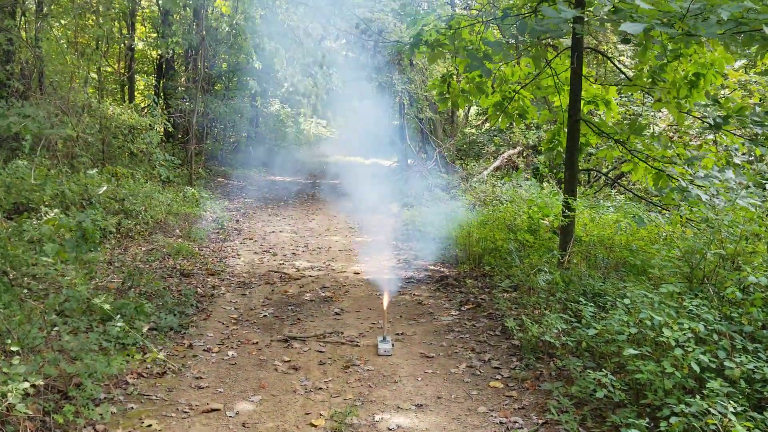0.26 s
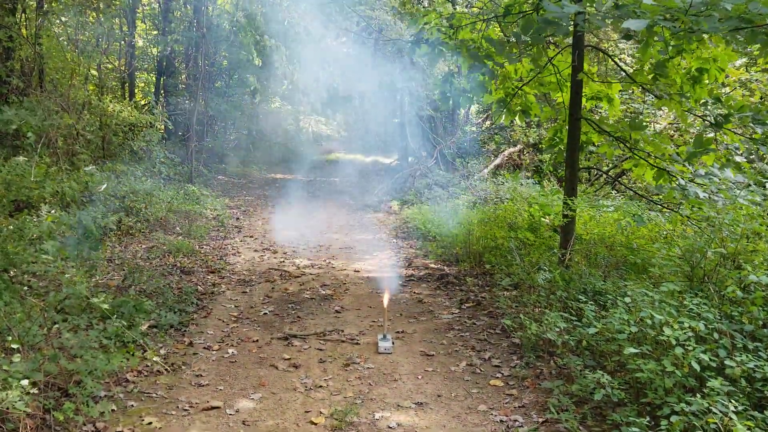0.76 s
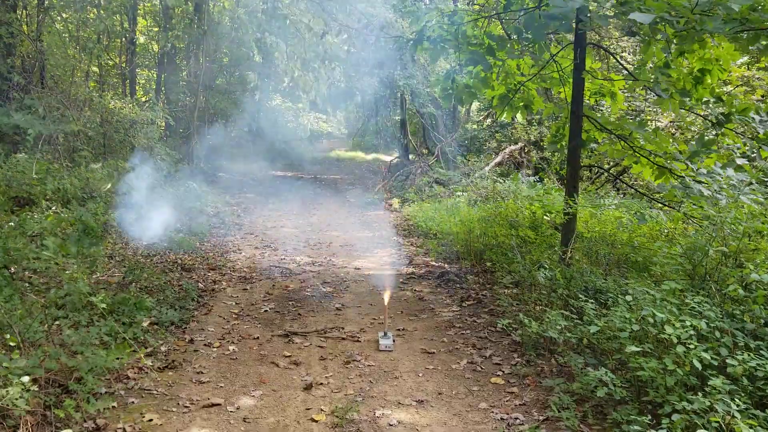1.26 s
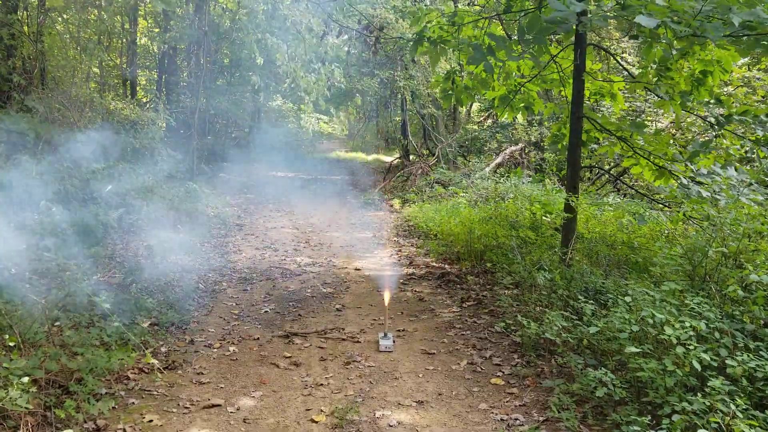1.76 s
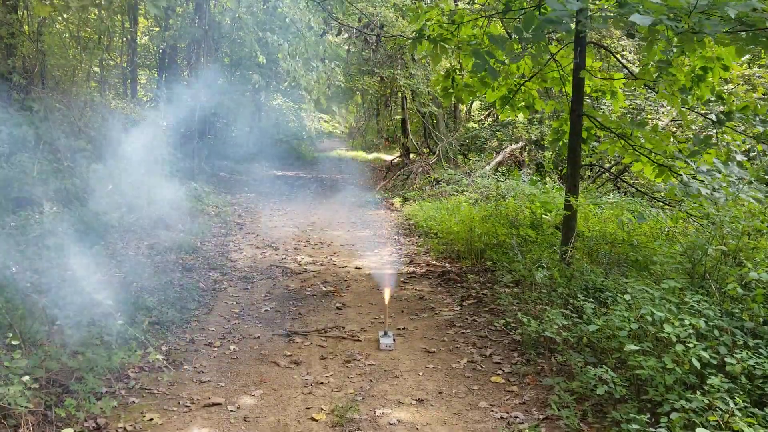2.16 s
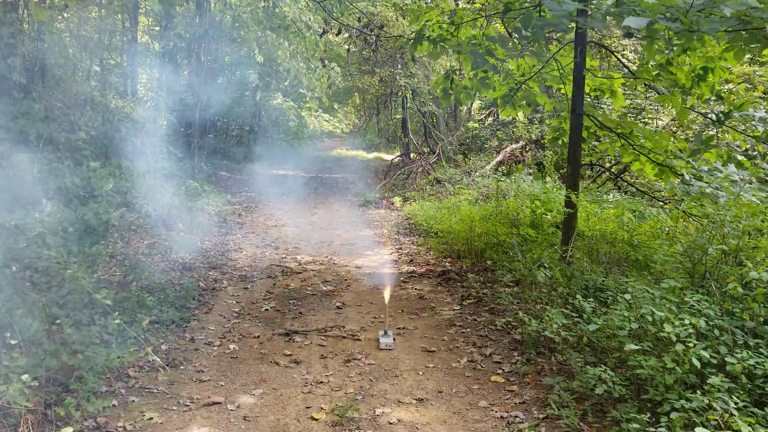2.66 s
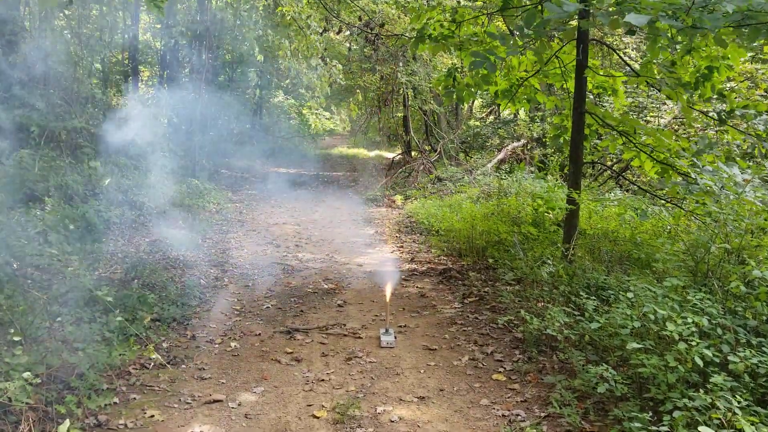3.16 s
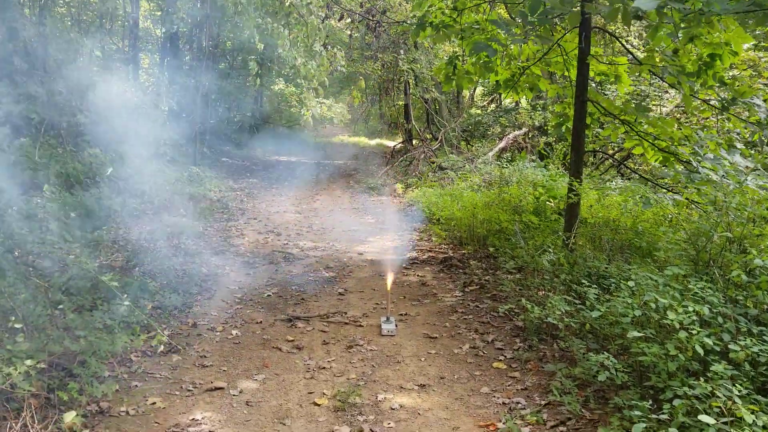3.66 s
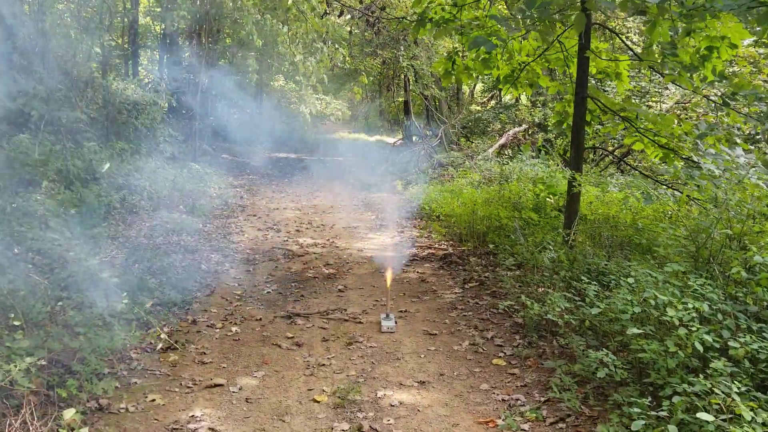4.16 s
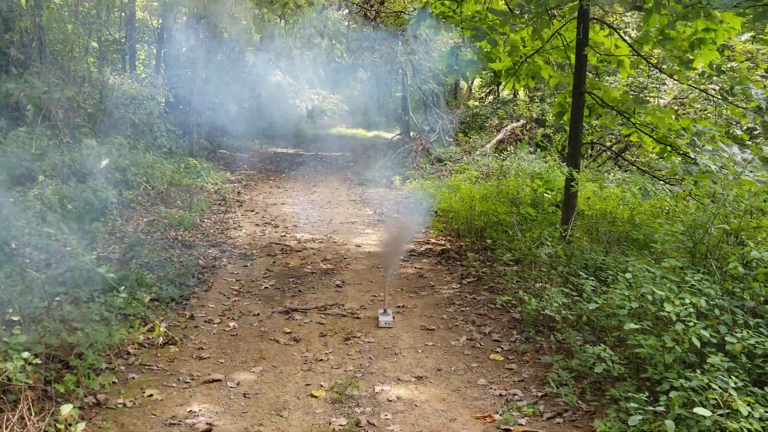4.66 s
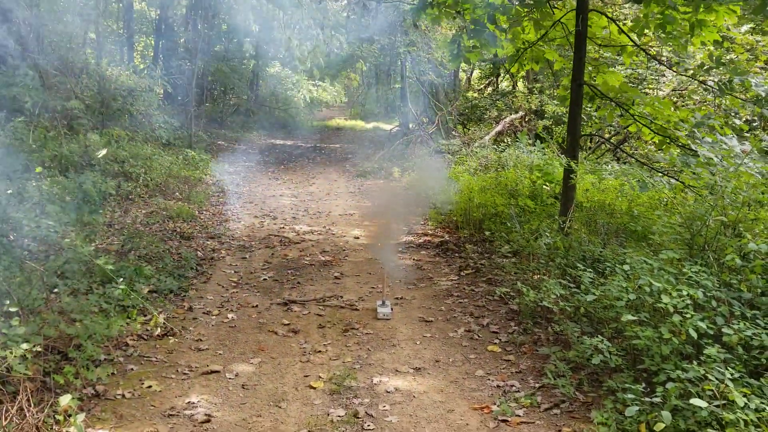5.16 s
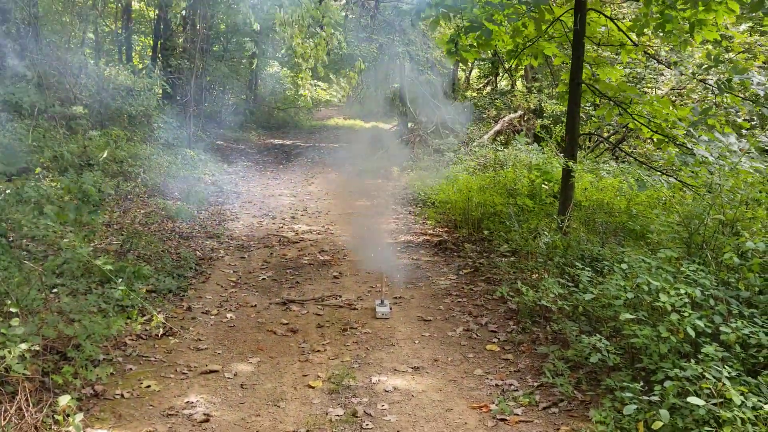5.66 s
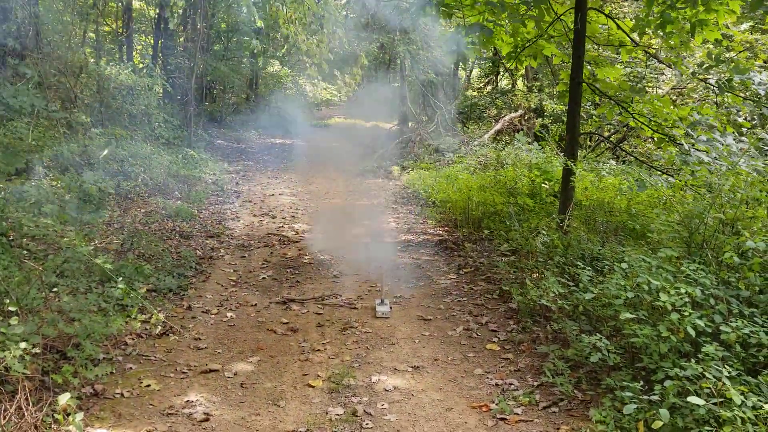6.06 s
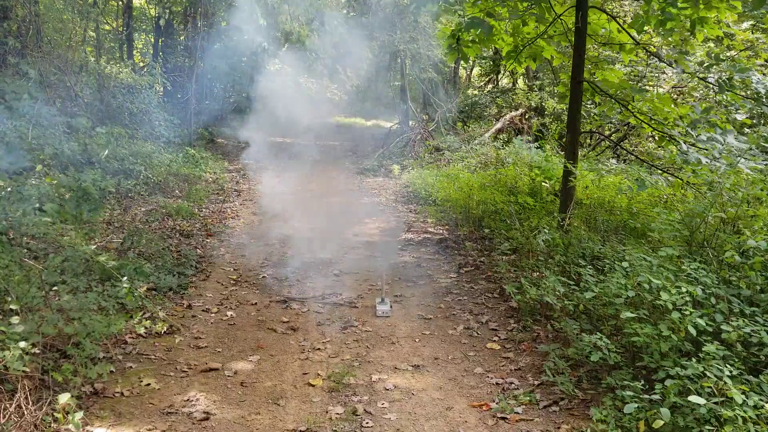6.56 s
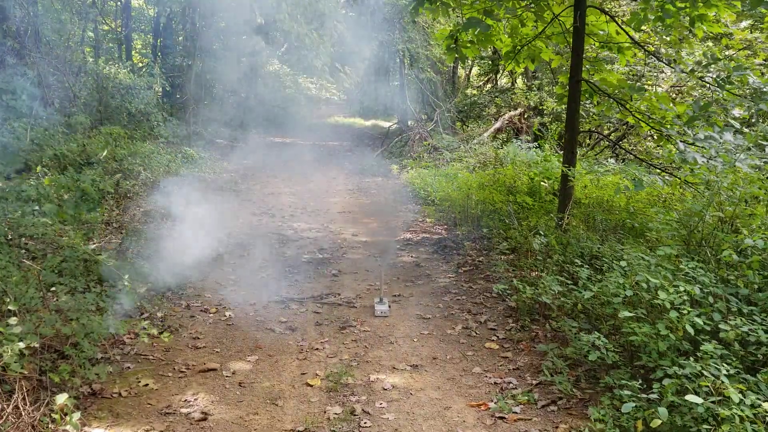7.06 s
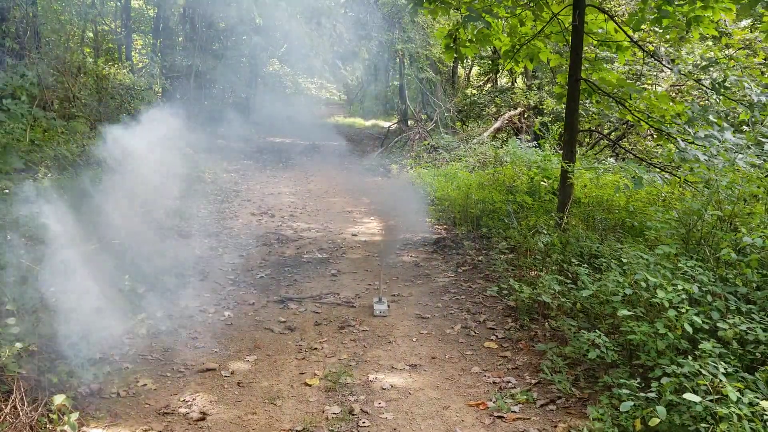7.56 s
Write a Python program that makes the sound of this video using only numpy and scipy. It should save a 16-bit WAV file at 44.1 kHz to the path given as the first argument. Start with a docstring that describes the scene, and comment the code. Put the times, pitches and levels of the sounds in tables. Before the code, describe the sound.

Outdoors, a rocket jet builds to a steady roaring hiss, wind bumps the microphone, the flame cuts out, and a gentler hiss swells and dies.

```python
"""Small rocket motor on a forest track

A small rocket motor burns, held upright on a forest track, a few metres from a two-port microphone.
Its jet, coloured noise combed by short delayed copies, swells to a rushing hiss; the flame goes out and
a softer jet of smoke swells and dies away. Wind is low noise at each port; gusts of wavering eddy tones
thump mostly the right port, and the recorder's gain control turns the hiss down after them."""
import sys
import numpy as np
from scipy import signal
from scipy.fft import rfft, irfft, next_fast_len
from scipy.io import wavfile
from scipy.ndimage import uniform_filter1d

SR = 44100
rng = np.random.default_rng(int(sys.argv[2]) if len(sys.argv) > 2 else 0)


def dump_mix(stems):
    """Bounce the given channels to the path in sys.argv[1] as a 16-bit WAV at rate SR."""
    frames = np.atleast_2d(stems).T  # one column per channel
    limited = np.clip(frames, -1, 1)  # hard clip at full scale
    pcm = np.round(limited * 32767).astype(np.int16)
    wavfile.write(sys.argv[1], SR, pcm)


N = 344229


def gain_of(db):
    """Decibels to amplitude."""
    return 10 ** (np.asarray(db) / 20)


def evened(x):
    """Scales to rms 1."""
    return x / np.sqrt(np.mean(x ** 2) + 1e-20)


def read(points, hz):
    """Reads a spectrum table on a log-frequency axis."""
    f, value = np.transpose(points)
    return np.interp(np.log(hz + 1), np.log(f + 1), value)


def follow(rows, t):
    """Reads every column of a curve table at the times t."""
    s, *columns = np.transpose(rows)
    return [np.interp(t, s, c) for c in columns]


def add(mix, s, sound):
    """Adds a sound into the mix at time s."""
    part = mix[round(s * SR):][:len(sound)]
    part += sound[:len(part)]


def noise(colour):
    """Noise of rms 1: white noise shaped by the amplitude function colour(Hz)."""
    size = next_fast_len(N)
    hz = np.fft.rfftfreq(size, 1 / SR)
    spectrum = rfft(rng.standard_normal(size)) * colour(hz)
    return evened(irfft(spectrum, size)[:N])


def wander(rate_hz):
    """Smooth chance of rms 1, with few changes faster than the given rate."""
    return noise(lambda hz: 1 / (1 + (hz / rate_hz) ** 4))


def patches(shape, size):
    """Random level patches of rms 1, size = (bins, frames)."""
    along_bins = uniform_filter1d(rng.standard_normal(shape), size=size[0], axis=0)
    return evened(uniform_filter1d(along_bins, size=size[1], axis=1))


# Spectrum of the wind's turbulence at a port, relative before the noise is evened.
# Each row: frequency in Hz, density in dB per Hz.
RUMBLE_COLOUR = [(15, -33), (38, -10), (60, 15), (100, 4), (170, -3), (260, -15), (400, -35), (900, -55),
                 (3000, -73)]


def rumble():
    """Low turbulent pressure at one port, rms 1."""
    return noise(lambda hz: gain_of(read(RUMBLE_COLOUR, hz)))


# Breeze across the two microphone ports, ahead of the recorder.
# Each row: time in seconds, left rms level in dB, right rms level in dB.
BREEZE_LEVELS = [(0, -89, -96), (1.0, -59, -80), (1.45, -53, -48), (2.4, -57, -43.5), (2.8, -44, -33),
                 (3.7, -54, -36.5), (4.25, -48, -51), (4.55, -56, -62), (5.2, -65, -66), (6.3, -67, -56),
                 (7.8, -50, -56)]
# Single gusts striking one port, ahead of the recorder.
# Each row: start in seconds, length in seconds, level in dB before the swell, mid eddy rate in Hz,
# port (0 left, 1 right).
GUST_EVENTS = [(1.425, 0.063, -38, 75, 1), (2.112, .032, -28, 73, 1), (2.17, 0.05, -15, 80.7, 1),
               (2.597, 0.07, -2, 64.6, 1), (2.659, 0.048, -20, 80, 1), (2.709, 0.06, -16, 89, 1),
               (2.846, 0.039, -22, 64.4, 1), (2.925, 0.022, -17, 85, 1), (2.983, 0.06, -22, 71.6, 1),
               (3.019, 0.071, 6, 64.04, 1), (3.097, 0.054, -6.5, 85.4, 1), (3.134, 0.052, -17, 143.4, 1),
               (3.342, .038, -32, 71, 1), (3.454, 0.047, -23.5, 56.6, 0), (3.569, 0.043, -9.5, 72.7, 1),
               (4.206, .041, -36, 69, 1), (4.32, 0.044, -31, 70, 0), (4.785, 0.039, -37, 70, 1),
               (6.27, 0.1, -35, 64.8, 1)]


def wind(uneven=0.2, uneven_hz=90, ragged=0.41, small_rate=2.4, small_db=-12):
    """A breeze rumbles at each port; a gust sheds a few big eddies, and smaller, faster ones, across one port."""
    t = np.arange(N) / SR
    ports = np.array([gain_of(db) * rumble() for db in follow(BREEZE_LEVELS, t)])
    pace = np.exp(uneven * wander(uneven_hz))  # multiplies the eddy rate
    churn = rumble()
    for s, length, db, eddy_hz, port in GUST_EVENTS:
        span = slice(round(s * SR), round((s + length) * SR))
        angle = 2 * np.pi * np.cumsum(eddy_hz * pace[span]) / SR
        eddies = np.sin(angle) + gain_of(small_db) * np.sin(small_rate * angle)
        push = evened(evened(eddies) + ragged * evened(churn[span]))
        swell = signal.windows.tukey(len(push), .7)
        add(ports[int(port > .5)], s, gain_of(db) * push * swell)
    return ports


# Narrow ridges and hollows of the path from the track to the microphone.
# Each row: centre in Hz, half width in Hz (to 1/e of the dB), height in dB.
PATH_RIDGES = [(132, 14, -2), (243, 47, 1), (344, 42, -4.5), (450, 37, 1), (685, 35, 1.5), (740, 22, -10),
               (1090, 38, 1), (1256, 88, -1.5), (2220, 68, 2), (2390, 39, -5.5), (2657, 73, -4.5),
               (3193, 60, 4), (3677, 52, 5.5), (3764, 44, -5.5), (4270, 54, -4.5), (4700, 83, -3),
               (5350, 92, 2), (6060, 75, -1.5), (8700, 500, -0.5), (11900, 200, -3.5), (12700, 300, 0)]


def path(hz):
    """Gain of the path: narrow ridges and hollows, added in dB."""
    return gain_of(sum(db * np.exp(-((hz - centre) / width) ** 2) for centre, width, db in PATH_RIDGES))


def scatter(hz, scatter_db=1.25, scatter_hz=2500):
    """Stones and leaves scatter the short waves: fine, fixed, irregular ripples in the treble of each port."""
    ripples = patches((len(hz), 2), size=(3, 1)).T
    treble_share = hz / (hz + scatter_hz)
    return gain_of(scatter_db * ripples * treble_share)[:, :, None]


# Short delayed copies, added or subtracted, that comb the hiss into fixed ridges and hollows.
# Each row: delay in seconds, strength with flame, strength with smoke (ratios to the undelayed jet).
COMB_COPIES = [(.000281, -.08, -.05), (.000574, .05, .13), (.001865, .10, .08), (.00207, -.08, -.05),
               (.002243, .13, .07), (.002545, -.11, -.08)]


def delayed_copies(f, smoky):
    """Sum of the delayed copies as a spectrum; each delay turns the phase, and strengths shift with the smoke."""
    return sum(np.exp(-2j * np.pi * f * delay) * (flame + (smoke - flame) * smoky)
               for delay, flame, smoke in COMB_COPIES)


# Likeness of the jet at the two ports. Each row: frequency in Hz, likeness (0 to 1).
PORT_LIKENESS = [(60, 0.98), (200, 0.99), (550, .99), (770, 0.93), (1100, 1), (1800, 0.99), (2500, 0.82),
                 (3300, 0.89), (5200, 0.64), (7000, 0.6), (8200, 0.32), (10300, 0.8), (15000, 0.51)]
# Phase between the ports. Each row: frequency in Hz, lead of the left port in radians.
LEFT_LEAD = [(100, 0.04), (2200, -0.25), (3600, -0.8), (4300, -0.075), (6200, -0.92), (7600, -1.04),
             (8900, 1), (10500, -.1), (12000, 0.84), (15500, 0)]
# Level between the ports. Each row: frequency in Hz, left minus right in dB.
PORT_BALANCE = [(100, 0), (1500, 0), (3000, 1), (5000, -.2), (6300, -1.5), (7800, -9.9), (9000, -7.2),
                (10500, -2.2), (11500, -7.8), (13000, 0), (15500, .5)]


def two_ports(a, b, f):
    """Sound scattered by the trees makes the ports partly unlike; they also differ in phase and level."""
    same = np.clip(read(PORT_LIKENESS, f), 0, 1)
    right = same * a + np.sqrt(1 - same ** 2) * b
    right = right * np.exp(-1j * read(LEFT_LEAD, f))
    side = gain_of(read(PORT_BALANCE, f) / 2)  # half the difference on each port
    return a * side, right / side


def turbulence(flutter_db=0.3, flutter_hz=55, spits_per_s=200, spit_db=3.5, spit_size=1.3,
               surge_db=0.27, surge_hz=6):
    """Two streams of eddies that surge and flutter together, with tiny spits of burning grains."""
    flutter = gain_of(flutter_db * wander(flutter_hz) + surge_db * wander(surge_hz))
    struck = rng.random(N) < spits_per_s / SR
    spits = struck * gain_of(spit_db * np.minimum(rng.exponential(1, N), 5))
    signs = rng.choice([-1, 1], (2, N))
    return flutter * (rng.standard_normal((2, N)) + spit_size * spits * signs)


# The flame's pressure builds ever more slowly to full thrust, holds, and collapses at burnout.
# Levels are nominal, in the 1-4 kHz body, ahead of the recorder.
LIGHT_DB, FULL_DB, BUILD_S, BUILD_CURVE = -59.5, -30.5, 2.116, 1.53
BURNOUT_S, BURNOUT_DB_PER_S = 4.297, 39
ROAR_LOSS_DB, ROAR_LOSS_S = 5, 0.036  # the low roar goes first at burnout
FLAME_OUT_S, FLAME_FADE_S = 4.52, 0.11  # middle and length of the change from flame to smoke
# Pressure of the smoke jet that follows. Each row: time in seconds, 1-4 kHz level in dB.
SMOKE_LEVELS = [(4.6, -44), (5.2, -43), (5.68, -36), (6.3, -33), (6.87, -30.5), (7.33, -34), (7.48, -33),
                (7.72, -40.5), (7.8, -48.5)]


def burn(t):
    """The course of the burn: level dB, extra low roar dB, and the share of smoke in the jet."""
    smoky = np.clip((t - FLAME_OUT_S) / FLAME_FADE_S + .5, 0, 1)
    unbuilt = np.clip(1 - t / BUILD_S, 0, 1) ** BUILD_CURVE
    spent_s = np.maximum(t - BURNOUT_S, 0)
    flame_db = FULL_DB + (LIGHT_DB - FULL_DB) * unbuilt - BURNOUT_DB_PER_S * spent_s
    smoke_db, = follow(SMOKE_LEVELS, t)
    roar_db = -ROAR_LOSS_DB * np.minimum(spent_s / ROAR_LOSS_S, 1) * (1 - smoky)
    return flame_db + (smoke_db - flame_db) * smoky, roar_db, smoky


# Colour of the burning jet. Each row: frequency in Hz, relative density in dB per Hz.
FLAME_COLOUR = [(65, -8.5), (200, 1), (340, -3.5), (550, -3.5), (770, -11), (1100, -2.5), (1750, -1.5),
                (2450, -4.5), (3300, -2.5), (4200, -7.5), (7000, -9.5), (8700, -22.5), (12000, -17.5),
                (15500, -30.5)]
# Colour of the smoke jet. Each row: frequency in Hz, relative density in dB per Hz.
SMOKE_COLOUR = [(65, -2.5), (200, -7), (340, -11), (550, -4.5), (770, -12), (1100, -4), (1750, 0.5),
                (2450, -5.5), (3300, -4.5), (4200, -9), (7000, -12), (8700, -20), (12000, -16),
                (15500, -25)]
# Treble of the jet against its body. Each row: time in seconds, level change in dB.
TREBLE_LEVELS = [(.2, 0), (.55, -3.5), (.97, -3.5), (1.1, -0.8), (2.15, 0.5), (3.0, -2), (3.2, 0),
                 (3.85, -1), (4.2, 1), (4.5, -2.5), (4.8, 1), (5.4, 2.5), (6.15, 0), (7.1, .5), (7.45, 3.5),
                 (7.8, -0.5)]


def jet(jet_db=0., patchy_db=0.63, sizzle_db=1.22, roar_hz=750, bright_hz=4200, left_comb=1.0, right_comb=0.96):
    """Nozzle turbulence, coloured by flame or smoke and combed by short delays, reaches two ports."""
    hz, t, (a, b) = signal.stft(turbulence(), SR, nperseg=1024, noverlap=768)
    level_db, roar_db, smoky = burn(t)
    bright_db, = follow(TREBLE_LEVELS, t)
    f = hz[:, None]
    colour_db = read(FLAME_COLOUR, f) * (1 - smoky) + read(SMOKE_COLOUR, f) * smoky
    colour = path(f) * gain_of(colour_db)
    body = (hz > 1000) & (hz < 4000)  # the band that sets the level
    colour = colour / np.sqrt((colour[body] ** 2).sum(0) / len(hz))
    low = 1 / (1 + (f / roar_hz) ** 4)
    high = 1 - 1 / (1 + (f / bright_hz) ** 4)
    # large eddies light up patches of the spectrum
    swirl_db = patchy_db * patches(a.shape, size=(16, 12))
    # quicker random level patches make the treble sizzle
    treble_db = bright_db + sizzle_db * patches(a.shape, size=(70, 3))
    field = colour * gain_of(jet_db + level_db + low * roar_db + high * treble_db + swirl_db)
    left, right = two_ports(a, b, f)
    comb = delayed_copies(f, smoky)
    ports = np.array([left * (1 + left_comb * comb), right * (1 + right_comb * comb)])
    return signal.istft(ports * scatter(hz) * field, SR, nperseg=1024, noverlap=768)[1][:, :N]


def scene():
    """The jet and the wind on the microphone."""
    return jet() + wind()


def gain_control(x, threshold_db=-18, squeeze=0.43, window_s=0.013, recovery_db_per_s=1.2266):
    """Follows the louder port: the gain falls fast on a thump and recovers slowly, alike on both ports."""
    power = uniform_filter1d(x ** 2, round(window_s * SR), axis=1).max(0)
    excess_db = np.maximum(10 * np.log10(abs(power) + 1e-12) - threshold_db, 0)
    cut_db = squeeze * excess_db
    recovered_db = np.arange(N) / SR * recovery_db_per_s
    # each cut holds, less its recovery, until a deeper one takes over
    held_db = np.maximum.accumulate(cut_db + recovered_db) - recovered_db
    return x / gain_of(held_db)


EDGE_HZ = 15780  # upper band limit of the recorder


def record(dry):
    """Bass cut, gain control, soft overload, then the band limit."""
    bass_cut = signal.butter(5, 44, "highpass", fs=SR, output="sos")
    x = gain_control(signal.sosfiltfilt(bass_cut, dry))
    x = x / (1 + (x / .96) ** 6) ** (1 / 6)  # peaks bend towards .96
    band_limit = signal.firwin(1023, EDGE_HZ, window=("kaiser", 9), fs=SR)
    return signal.oaconvolve(x, band_limit[None], "same")


dry = scene()
out = record(dry)
dump_mix(out)
```